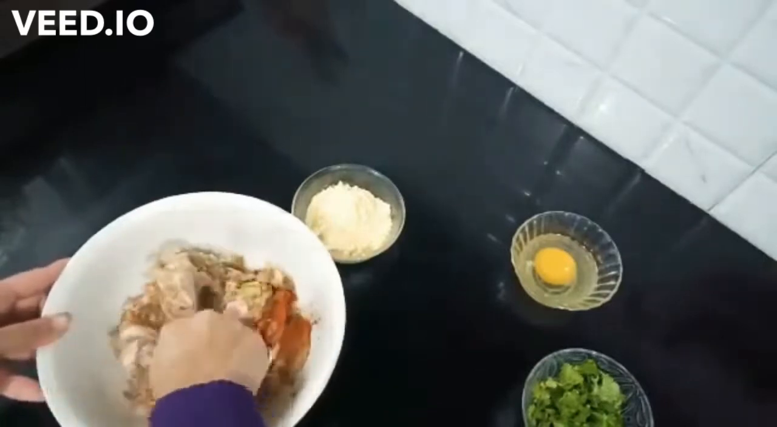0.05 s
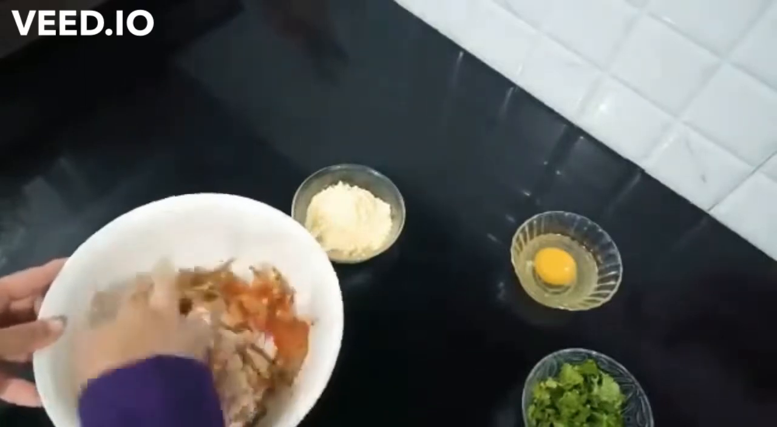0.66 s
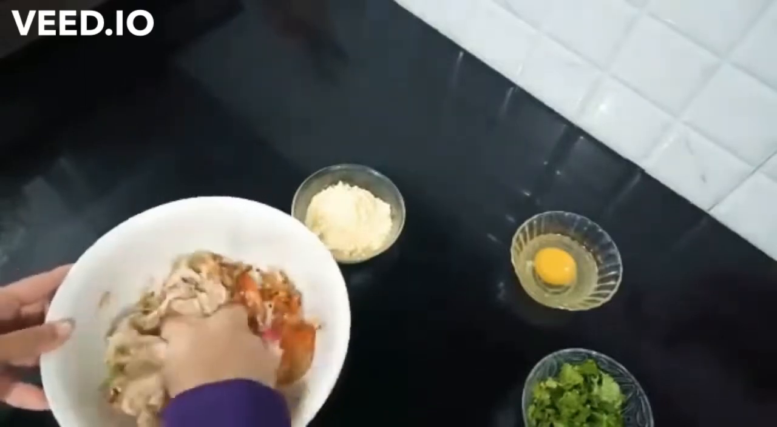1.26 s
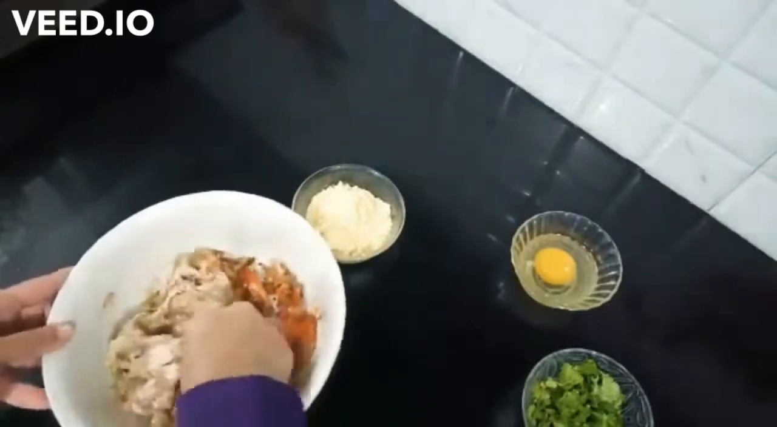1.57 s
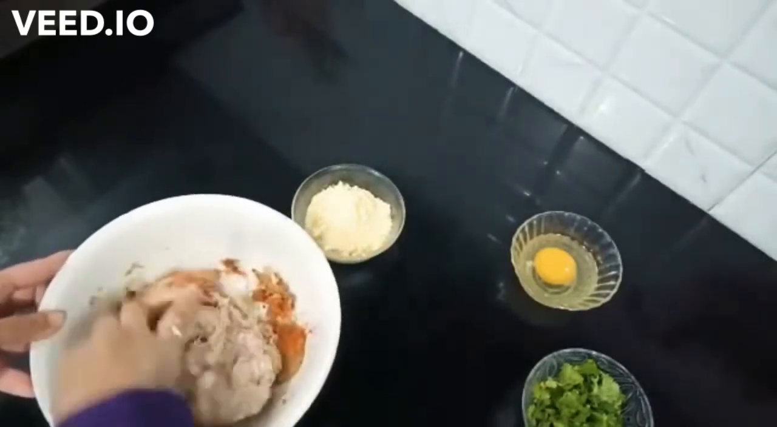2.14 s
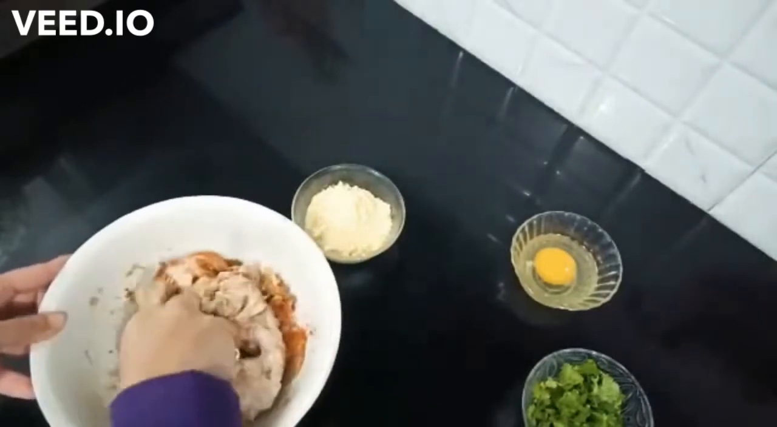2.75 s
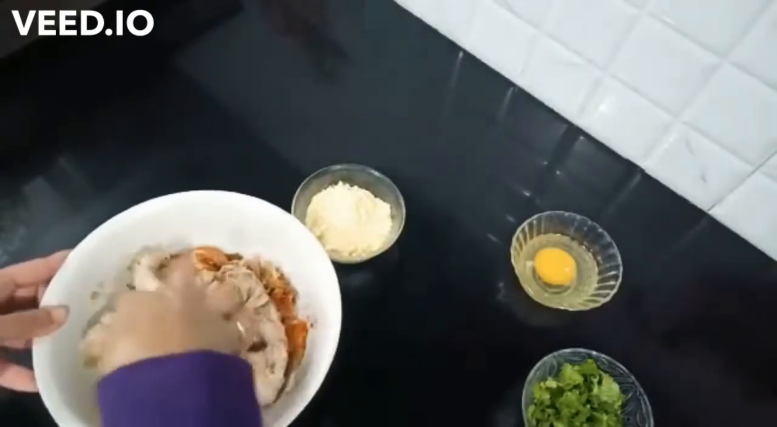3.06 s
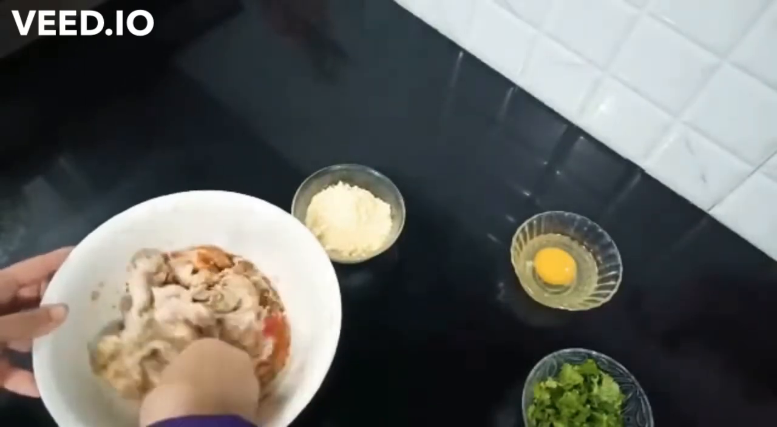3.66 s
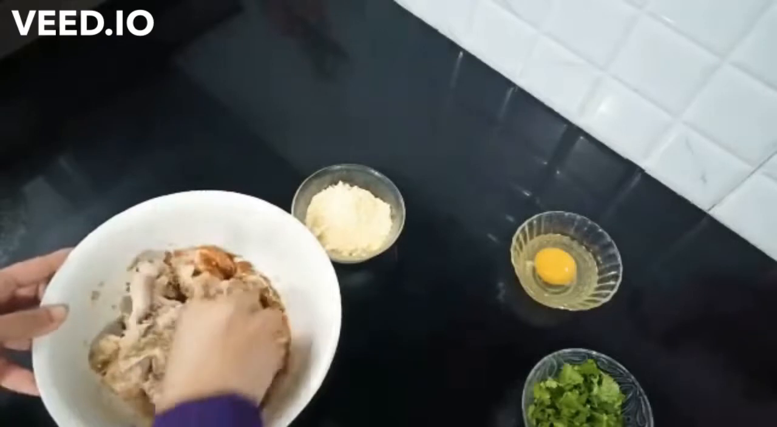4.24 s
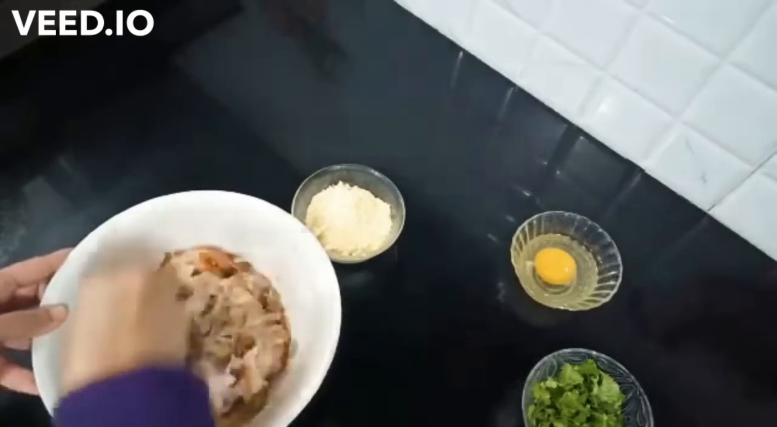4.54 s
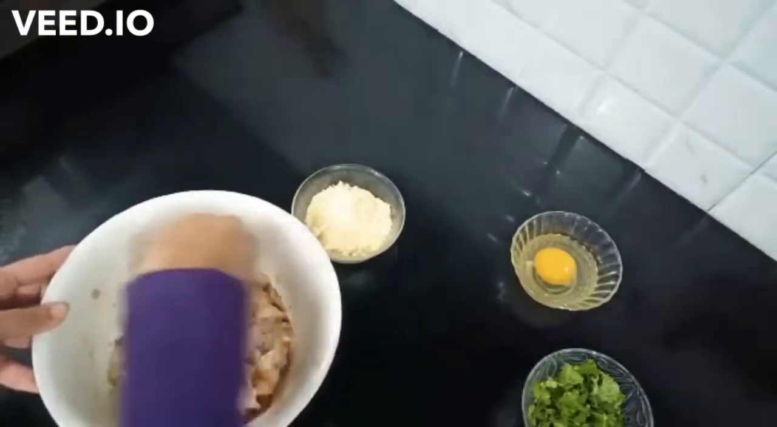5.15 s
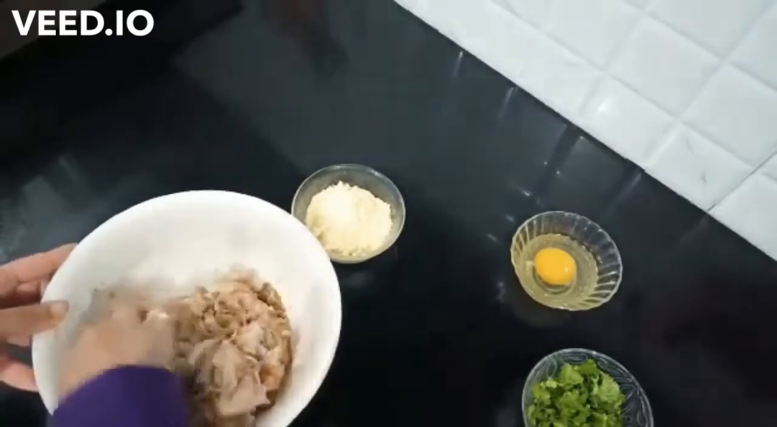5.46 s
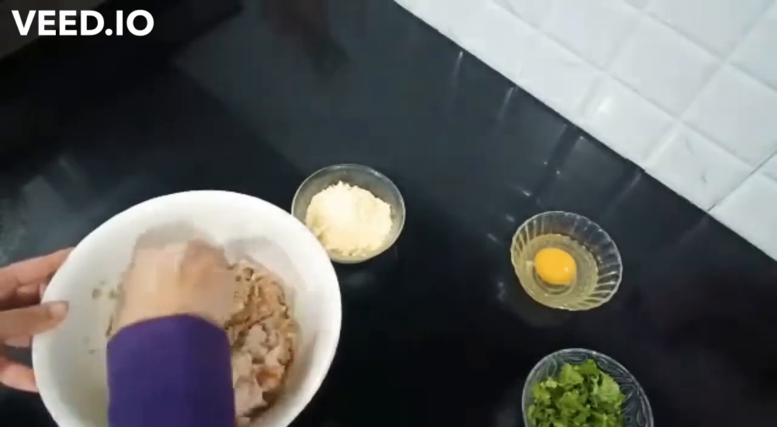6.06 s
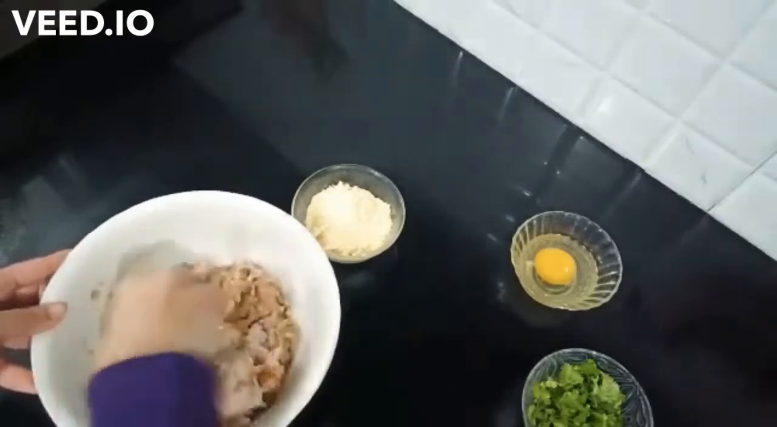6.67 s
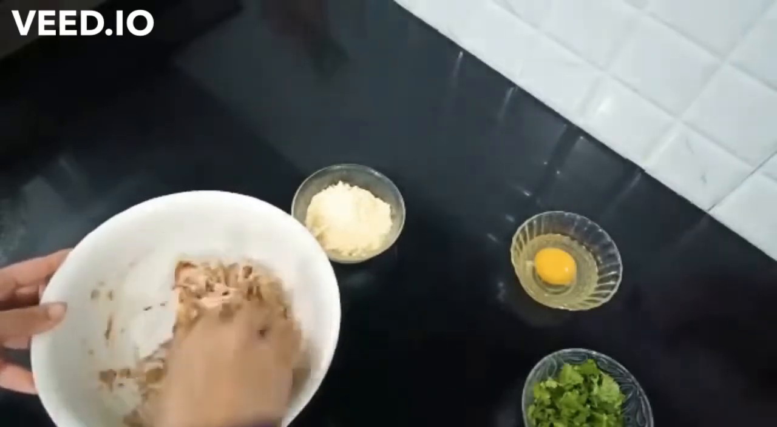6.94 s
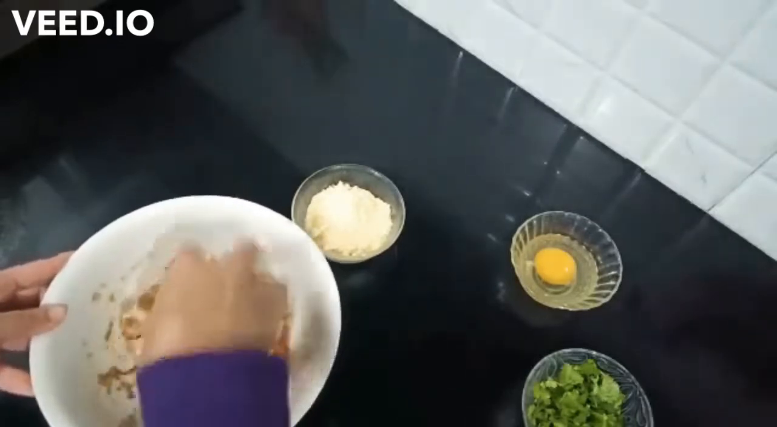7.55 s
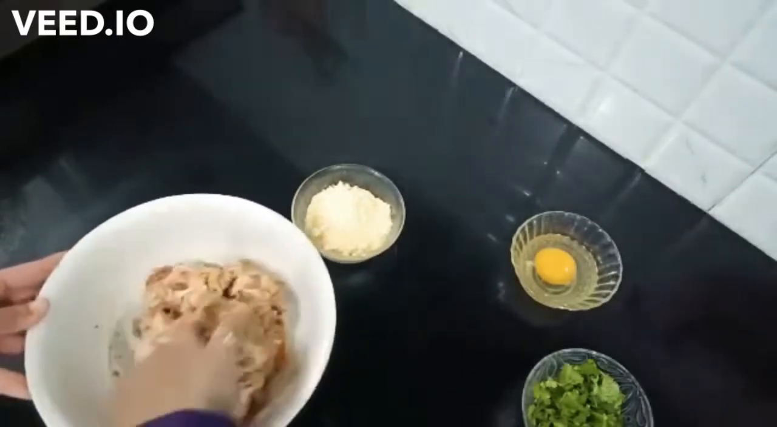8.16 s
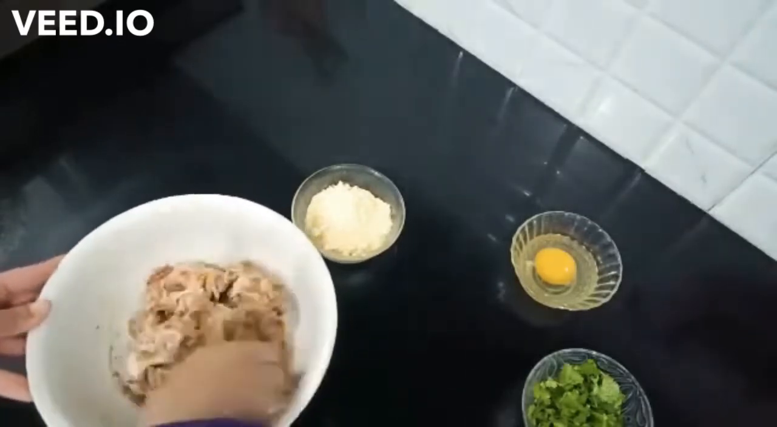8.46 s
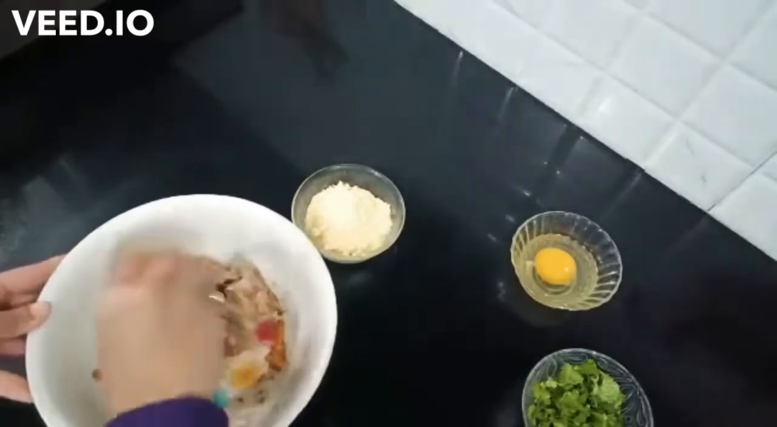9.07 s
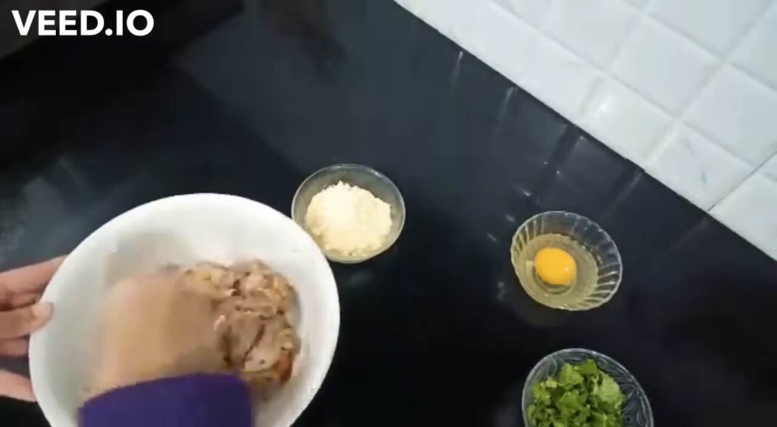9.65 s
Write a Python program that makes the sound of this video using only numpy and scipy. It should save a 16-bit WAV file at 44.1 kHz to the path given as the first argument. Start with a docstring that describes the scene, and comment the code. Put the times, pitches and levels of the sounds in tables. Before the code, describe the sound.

A hand squeezes and mixes wet minced meat in a bowl, making uneven, repeated squelches with a fine sticky crackle. Small air pockets pop and squirt between the fingers. The bowl knocks sharply on the stone counter about two seconds in, then bumps now and again and rubs with a low rumble in the second half. The sound is fairly close, with a short echo from a tiled kitchen.

```python
"""Kneading minced meat

A hand works wet minced meat in a bowl on a stone counter, in a tiled kitchen. With every stroke
sticky films tear in a fine crackle and the mass smears along the bowl. Air pockets pop and squirt,
thin strands snap, and the bowl rubs, rocks and knocks on the counter."""
import sys
import numpy as np
from scipy import signal
from scipy.fft import rfft, irfft, next_fast_len
from scipy.io import wavfile
from scipy.ndimage import map_coordinates

SR = 44100
rng = np.random.default_rng(int(sys.argv[2]) if len(sys.argv) > 2 else 0)


def store_pcm(level_fs):
    """Save levels as 16-bit WAV."""
    pcm = np.round(np.clip(level_fs, -1, 1) * 32767).astype(np.int16)
    wavfile.write(sys.argv[1], SR, np.atleast_2d(pcm).T)


N = 432621
TOP_HZ = 15200


def kneading():
    """Films of meat tear in clumps under the fingers; the mass smears along the bowl with a hollow ring."""
    squeeze_gain, crackle_gain, smear_gain = hand_strokes()
    clumps = wobble(55)
    squelching = squelch() * squeeze_gain * amp(1.86 * clumps)
    crackling = crackle() * crackle_gain * amp(3.3 * clumps)
    smearing = smear() * smear_gain * amp(2.24 * clumps)
    ring = hollow_ring()
    hollow = amp(-12) * signal.fftconvolve(smearing, ring / np.linalg.norm(ring))[:N]
    return in_room(squelching + smearing, wet_db=-3.5)[:N] + in_room(crackling, wet_db=-4)[:N] + hollow


# The strokes of the hand. Each row: grab time, tightening time and easing time in seconds,
# then the levels of squeeze, crackle and smear in dB.
HAND_STROKES = [(0.0, 0.028, 0.036, -56, -70, -61), (0.1, 0.056, 0.044, -55.5, -59.5, -63.5),
                (0.43, 0.05, 0.044, -66.5, -69, -64), (0.53, 0.19, 0.17, -52, -62, -59.5),
                (0.99, .06, 0.38, -53.5, -63.5, -57), (1.23, 0.16, 0.091, -46, -57, -60.5),
                (1.6, 0.021, .17, -54.5, -63.5, -57), (1.92, .3, 0.12, -49.5, -60, -54),
                (2.505, 0.36, .14, -50.5, -61.5, -62), (2.96, 0.097, 0.061, -56.5, -63.5, -63.5),
                (3.325, .3, 0.25, -52.5, -63, -58.5), (3.9, 0.045, 0.13, -57, -68, -62),
                (4.11, 0.14, 0.12, -51, -61.5, -63), (4.66, 0.22, 0.079, -53, -63, -69),
                (5.171, 0.17, 0.28, -52.5, -62.5, -53), (5.768, .12, .12, -55, -65, -61.5),
                (6.03, .08, .1, -55.5, -63, -61), (6.375, .01, .01, -62, -68, -63),
                (6.425, .03, 0.22, -53, -60, -58), (6.62, 0.16, 0.054, -53, -61.5, -59.5),
                (6.99, .03, 0.08, -59.5, -66.5, -71), (7.11, 0.14, 0.31, -53, -65, -57.5),
                (7.742, 0.088, 0.25, -56, -65, -56.5), (8.14, 0.045, 0.027, -53, -62, -63),
                (8.441, 0.36, .06, -53, -62.5, -56), (8.77, 0.037, 0.07, -50, -58, -58.5),
                (8.969, 0.049, 0.27, -62, -71.5, -60), (9.222, 0.1, 0.15, -49.5, -62, -56.5),
                (9.62, .03, 0.044, -58, -81, -59.5), (9.79, 0.019, .02, -49, -63.5, -61)]


def hand_strokes():
    """Gains of squeeze, crackle and smear: the hand catches, tightens, eases and lets go."""
    # meat clinging to the moving hand keeps sounding between strokes
    squeeze_gain, crackle_gain, smear_gain = (np.full(N, amp(db)) for db in (-68, -88, -64))
    for start, tighten, ease, squeeze_db, crackle_db, smear_db in HAND_STROKES:
        grip = gesture(start, [(0, -3), (tighten, 0), (tighten + ease, -3.5)], release_db_per_s=113)
        # the mass is shoved hardest at the grab, and slides on more slowly
        shove = gesture(start, [(0, 3), (tighten, 0)], release_db_per_s=37)
        squeeze_gain = np.maximum(squeeze_gain, amp(squeeze_db) * grip)
        crackle_gain = np.maximum(crackle_gain, amp(crackle_db) * grip)
        smear_gain = np.maximum(smear_gain, amp(smear_db) * shove)
    return squeeze_gain, crackle_gain, smear_gain


# The juicy midrange of wet tearing. Each row: frequency in Hz, relative level in dB.
WET_TONE = [(300, -60.5), (700, -2.5), (1200, -1.5), (1500, -2.5), (2300, -2.5), (3100, 2.5), (3900, 0.5),
            (4600, -4.5), (5600, -19), (7500, -7.5), (12000, -81.5)]


def squelch():
    """Wet films burst as the meat is squeezed."""
    films = grains(N, per_second=750, spread_db=4.5, pitch_hz=3000, octaves=1.23, cycles=0.95)
    return shaped(films, WET_TONE)


# The crisp top of fine tearing. Each row: frequency in Hz, relative level in dB.
CRISP_TONE = [(3500, -14), (5500, -11.5), (7400, -1), (9500, -12), (11500, -12), (14500, -6.5),
              (16000, -5.5)]


def crackle():
    """Sticky films tear in a dense fizz of tiny clicks."""
    films = grains(N, per_second=2200, spread_db=3, pitch_hz=9500, octaves=0.7, cycles=0.17)
    return shaped(films, CRISP_TONE)


# The dull body of sliding meat. Each row: frequency in Hz, relative level in dB.
SMEAR_TONE = [(150, -29), (300, 5), (450, -3), (620, 0.5), (900, -4), (1400, 1.5), (2000, -45), (3500, -36)]


def smear():
    """The mass drags along the bowl with a low, grainy mush."""
    films = grains(N, per_second=1200, spread_db=3.5, pitch_hz=1087, octaves=1.225, cycles=0.45)
    return shaped(films, SMEAR_TONE)


# Short pitched pops and clicks: air pockets, and small clinks as the bowl knocks.
# Each row: start in seconds, dry peak in dB, pitch in Hz, wet tearing in dB relative to the ring.
POPS_AND_CLICKS = [(0.0593, -33, 3570, -17), (0.164, -34.5, 2600, 2), (0.5533, -35, 3470, -6),
                   (0.7336, -26, 3510, 3), (0.832, -30.5, 3240, 0), (1.0255, -25.5, 3020, 3),
                   (1.2657, -18.5, 1570, 0.5), (1.3537, -24, 3700, -3), (1.3828, -18.5, 3380, -3),
                   (1.462, -21, 2760, -12), (2.3054, -29, 3130, -1), (2.359, -33.5, 1410, -16),
                   (2.57, -22, 2150, -32), (2.634, -27.5, 3340, -19), (2.7377, -27.5, 1880, -6),
                   (2.805, -28.5, 2000, -3), (2.9695, -30.5, 2570, -2), (3.3573, -29, 3117, 3),
                   (4.2425, -23.5, 2530, 6), (4.7615, -28.5, 3260, -4), (4.8002, -21, 1430, 0.5),
                   (4.8366, -15, 3570, -2.5), (5.4434, -28, 1400, 13.5), (5.624, -31, 1300, -3),
                   (6.429, -31, 3150, -2), (6.7605, -33, 1427, -10), (7.1205, -23, 1460, -1),
                   (7.1945, -25.5, 3430, 5), (7.376, -34, 1300, -8), (7.748, -27.5, 3080, -8),
                   (8.0014, -33.5, 1460, -6), (8.187, -33, 1470, 0), (8.4422, -27, 1410, -5),
                   (9.3257, -27.5, 1440, -7), (9.4614, -28.5, 1620, -14)]


def pops_and_clicks():
    """A rip and a ring of about two cycles, as when a film tears open a small soft-walled cavity."""
    track = np.zeros(N)
    for start, db, pitch_hz, tear_db in POPS_AND_CLICKS:
        tear = amp(tear_db) * snap(WET_TONE, decay_s=0.0018)
        fine_snap = amp(-17 + 0.3 * tear_db) * snap(CRISP_TONE, decay_s=0.003)  # grows with the tearing
        t = np.arange(len(tear)) / SR
        ring = np.sin(2 * np.pi * pitch_hz * t) * strike(t, attack_s=0.0004, decay_s=2.2 / pitch_hz)
        pop = unit(ring) + tear + fine_snap
        add(track, start, amp(db) * in_room(pop / np.abs(pop).max(), wet_db=-4.5))
    return track


# Thin strands breaking. Each row: start in seconds, level in dB.
STRAND_SNAPS = [(1.012, -57), (1.2326, -58), (3.357, -59), (3.8106, -53.5), (5.624, -62), (5.769, -56),
                (5.883, -55.5), (6.785, -52), (7.122, -51), (7.195, -52), (7.5505, -57.5), (8.9101, -56),
                (9.2359, -55.5)]


def strand_snaps():
    """Strands snap with a bright tick as the hand pulls away."""
    track = np.zeros(N)
    for start, db in STRAND_SNAPS:
        add(track, start, amp(db) * in_room(snap(CRISP_TONE, decay_s=0.0041), wet_db=-3.5))
    return track


# Short wet spurts. Each row: start in seconds, length in seconds, relative level in dB, pitch in Hz.
FINGER_SQUIRTS = [(0.112, 0.08, -40.5, 3320), (0.739, 0.048, -39.5, 3060), (0.992, 0.021, -43.5, 5860),
                  (1.263, 0.023, -43, 1620), (1.352, 0.042, -28, 3570), (1.38, .03, -28, 1380),
                  (1.462, .008, -28, 1610), (2.564, 0.026, -28, 2220), (4.241, 0.021, -31.5, 3680),
                  (4.755, 0.062, -41, 2470), (7.19, 0.02, -37, 3840), (7.376, 0.017, -31.5, 1370),
                  (7.475, 0.019, -25, 1840), (8.777, 0.03, -33, 2930)]


def squirts():
    """Meat and trapped air sputter out, coloured by the gap between the fingers."""
    track = np.zeros(N)
    for start, length, db, pitch_hz in FINGER_SQUIRTS:
        n = int(length * SR)
        sputter = grains(n, per_second=1100, spread_db=1.5, pitch_hz=pitch_hz, octaves=0.41, cycles=1.3)
        gap_tone = [(pitch_hz / 5, -35), (pitch_hz / 1.8, 0), (pitch_hz * 1.3, 0), (pitch_hz * 3, -14)]
        squirt = shaped(sputter, gap_tone) * signal.windows.tukey(n, 0.1)
        add(track, start, amp(db - 8) * in_room(squirt, wet_db=-6))
    return track


# The bowl hitting the counter. Each row: start in seconds, level before EQ in dB,
# then the EQ in dB for weight (lows), body (low mids) and hardness (highs).
BOWL_KNOCKS = [(0.246, -65, 14, 13, 0), (0.488, -69.5, 16.5, 12, 10), (1.025, -63, 16, 3, -1),
               (1.849, -27, -1, 2, 0.5), (2.53, -64.5, 12.5, 15.5, 3), (2.589, -54.5, 5, 1.5, -2),
               (3.099, -64, 5, 4, -2), (3.323, -61, 18, 19.5, 11), (3.591, -57.5, -17, 12, 1),
               (3.712, -53.5, 5, -4, -4), (3.914, -60, 6, 9.5, -13), (4.314, -58.5, 7, 7.5, 3),
               (4.391, -62.5, -7, 12, -19), (4.835, -54.5, -21, -14, 8), (4.987, -53, 9, 7.5, -8),
               (6.426, -58, -1, 15, 7), (7.147, -56, 7, 1, -17), (7.48, -45.5, -5, 14, -2),
               (7.746, -63.5, 21.5, 22.5, 12), (7.866, -63, 3, -5, -4), (8.2, -64.5, 8, 7, 0),
               (8.448, -57.5, 16, 13, -3), (8.539, -50.5, 15, 12, -5), (9.436, -55, 7, 2.5, -6),
               (9.52, -66, 6, 14, -12)]


def bowl_knocks():
    """The bowl tips under the hand and falls back with a crack: heavy blows deeper, hard ones brighter."""
    track = np.zeros(N)
    for start, db, weight_db, body_db, hardness_db in BOWL_KNOCKS:
        eq = [(50, weight_db - 6), (170, weight_db), (340, body_db), (520, body_db / 2),
              (850, 0), (1400, 0), (2400, hardness_db)]
        add(track, start, amp(db) * equalise(knock(), eq))
        add(track, start, amp(db + 0.2) * snap(WET_TONE, decay_s=0.0015))
    return track


# The thud of the bowl's foot on stone. Each row: frequency in Hz, relative level in dB.
THUD_TONE = [(35, -51), (60, -20), (120, -39.5), (151, -9.5), (186, -21), (317, -18), (364, -17.5),
             (503, -23.5), (727, -11.5), (916, -11), (1560, -25), (2840, -35), (3580, -25.5), (5550, -45.5),
             (15000, -61.5)]


def knock():
    """One blow: the foot chatters for a few milliseconds, then the bowl and the room ring on."""
    ring = hollow_ring()
    echo = room_tail(build_up_s=0.0037)[:len(ring)]
    t = np.arange(len(ring)) / SR
    chatter = rng.standard_normal(len(t)) * strike(t, attack_s=0.00041, decay_s=0.0057)
    thud = shaped(unit(chatter) + amp(-0.5) * unit(echo), THUD_TONE)
    return thud + amp(2.8) * ring


# The hollow ring of bowl and room together after a knock.
# Each row: frequency in Hz, relative level in dB, seconds to fade by 60 dB.
KNOCK_RESONANCES = [(157, -8, .58), (210, -19, .43), (275, -14, .45), (313, -12, .38), (345, -11, .3),
                    (414, -8, .45), (441, -10, .35), (484, -5, .28), (523, -3, .35), (594, -6, .37),
                    (665, -4, .37), (700, -5, .35), (780, 2, .42), (824, 1.5, .42), (858, 0, .36),
                    (888, -1, .35), (920, 2, .5), (952, 1, .42), (985, -7, .4), (1044, -9, .35),
                    (1077, -6, .5), (1143, -7, .46), (1181, -6, .4), (1228, -8, .33), (1297, -9, .4),
                    (1341, -7, .3), (1655, -12, .27)]


def hollow_ring():
    """The resonances of bowl and room die away together after one touch; rms 1."""
    t = np.arange(SR * 3 // 4) / SR
    hz, db, t60 = np.transpose(KNOCK_RESONANCES)[:, :, None]
    phase = 2 * np.pi * rng.random(hz.shape)
    resonances = amp(db - 60 * t / t60) * np.sin(2 * np.pi * hz * t + phase)
    attack = 1 - np.exp(-t / 0.00016)
    return unit(resonances.sum(axis=0) * attack)


# Shoves of the bowl over the counter. Each row: start in seconds, length in seconds, level in dB.
BOWL_PUSHES = [(4.585, 0.22, -45.5), (4.946, 0.35, -43.5), (5.406, 0.37, -45), (5.716, 0.57, -42),
               (6.42, 0.28, -49.5), (7.136, 0.41, -48), (7.763, 0.36, -44), (8.434, 0.17, -39),
               (8.747, 0.16, -47.5), (9.107, 0.46, -47), (9.6, 0.19, -51.5)]
# The low rumble of that rubbing. Each row: frequency in Hz, relative level in dB.
RUB_TONE = [(15, -51), (30, -28), (45, -6), (58, -20), (85, 3), (100, 2.5), (113, 0.5), (140, -3.5),
            (157, 8.5), (175, -8), (200, -8.5), (245, -38), (320, -12.5), (480, -53.5)]


def bowl_rub():
    """The held bowl judders over the counter with a rumble that swells at each push."""
    rise_s, held_db = 0.095, -58
    gain = np.full(N, amp(held_db))
    for start, length, db in BOWL_PUSHES:
        push = gesture(start, [(0, -4), (rise_s, 0), (max(length, rise_s), 0)], release_db_per_s=44)
        gain = np.maximum(gain, amp(db) * push)
    judder = amp(0.65 * wobble(12))
    return gain * judder * shaped(rng.standard_normal(N), RUB_TONE)


# The tiled kitchen's reverb. Each row: frequency in Hz, seconds to fade by 60 dB.
KITCHEN_DECAY = [(120, .55), (400, .52), (1000, .54), (3500, .48), (7000, .3), (14000, .17)]


def room_tail(build_up_s):
    """A diffuse echo of energy 1 that swells quickly and loses its treble first."""
    hz, t, noise = signal.stft(rng.standard_normal(SR * 3 // 4), SR, nperseg=256)
    fade = amp(-60 * t / along(KITCHEN_DECAY, hz)[:, None])
    tail = signal.istft(noise * fade, SR, nperseg=256)[1]
    tail *= 1 - np.exp(-np.arange(len(tail)) / SR / build_up_s)
    return tail / np.linalg.norm(tail)


def in_room(x, wet_db):
    """A sound followed by the answer of the tiled walls."""
    response = amp(wet_db) * room_tail(build_up_s=0.00073)
    response[0] += 1
    return signal.fftconvolve(x, response)


# The kitchen's soft noise bed. Each row: frequency in Hz, relative level in dB.
ROOM_TONE = [(15, -40), (30, -22), (48, -10), (60, -14), (154, 0), (300, -4), (462, -12), (1000, -13),
             (3000, -16), (3800, -18), (5500, -39), (7300, -40), (9800, -48), (15000, -45)]


def room_tone():
    """A faint, steady hush under everything."""
    return amp(-55.5) * shaped(rng.standard_normal(N), ROOM_TONE)


def grains(n, per_second, spread_db, pitch_hz, octaves, cycles):
    """n samples of tiny bursting films: damped sines scattered either side of pitch_hz; rms 1."""
    count = max(int(per_second * n / SR), 1)
    when, size, pitch = rng.random((count, 3)).T
    hz = np.minimum(pitch_hz * 2 ** (octaves * (2 * pitch - 1)), TOP_HZ)
    age = np.arange(128)
    turns = hz[:, None] * age / SR
    size_db = -spread_db * np.log(size + 0.006)  # many small, a few large
    bursts = amp(size_db)[:, None] * np.sin(2 * np.pi * turns) * np.exp(-turns / cycles)
    positions = (when * n).astype(int)[:, None] + age
    return unit(np.bincount(positions.ravel(), bursts.ravel(), n)[:n])


def snap(tone, decay_s):
    """A rip or crack: a few milliseconds of coloured noise; rms 1."""
    t = np.arange(SR // 50) / SR
    return shaped(rng.standard_normal(len(t)) * strike(t, attack_s=0.0003, decay_s=decay_s), tone)


def strike(t, attack_s, decay_s):
    """A percussive envelope with exponential rise and fall."""
    return np.exp(-t / decay_s) * (1 - np.exp(-t / attack_s))


def gesture(start, points, release_db_per_s):
    """A gain that opens at start, follows (seconds after start, dB) points, then fades."""
    times, levels = np.transpose(points)
    t = np.arange(SR * 3 // 2) / SR
    db = np.interp(t, times, levels) - release_db_per_s * np.maximum(t - times[-1], 0)
    attack = np.minimum(t / 0.0038, 1)
    gain = np.zeros(N)
    add(gain, start, amp(db) * attack)
    return gain


def wobble(rate):
    """A smooth random curve, rate knots a second."""
    return map_coordinates(rng.standard_normal(int(N * rate / SR) + 4), [np.arange(N) * rate / SR])


def equalise(x, eq):
    """Filter x by (Hz, dB) points, with minimum phase so that attacks stay sharp."""
    m = 2 * next_fast_len(len(x) // 2 + 4096)
    gain = amp(along(eq, np.fft.rfftfreq(m, 1 / SR)))
    cepstrum = irfft(np.log(np.maximum(gain, 1e-6)), m)
    cepstrum[1:m // 2] *= 2
    cepstrum[m // 2 + 1:] = 0
    return irfft(rfft(x, m) * np.exp(rfft(cepstrum)), m)[:len(x)]


def shaped(x, tone):
    """x coloured by a tone curve, at rms 1."""
    return unit(equalise(x, tone))


def along(points, hz):
    """(Hz, value) points read on a log axis."""
    frequencies, values = np.transpose(points)
    return np.interp(np.log(hz + 1), np.log(frequencies + 1), values)


def amp(db):
    """Decibels to gain."""
    return 10 ** (np.asarray(db) / 20)


def unit(x):
    """Scale to rms 1."""
    return x / np.sqrt(np.mean(x ** 2) + 1e-20)


def add(track, start, sound):
    """Mix a sound into the track at start seconds."""
    first = max(round(start * SR), 0)
    track[first:first + len(sound)] += sound[:max(N - first, 0)]


def scene():
    """Meat and bowl over the hush of the kitchen, in mono."""
    hush = room_tone()
    handwork = kneading() + pops_and_clicks() + strand_snaps() + squirts()
    bowl = bowl_knocks() + bowl_rub()
    return (handwork + bowl + hush)[None]


def record(dry):
    """A steep high cut at TOP_HZ."""
    m = next_fast_len(N + SR // 2)
    hz = np.fft.rfftfreq(m, 1 / SR)
    high_cut = np.clip((TOP_HZ - hz) / 300 + 0.5, 0, 1)
    return irfft(rfft(dry, m) * high_cut, m)[:, :N]


dry = scene()
out = record(dry)
store_pcm(out)
```